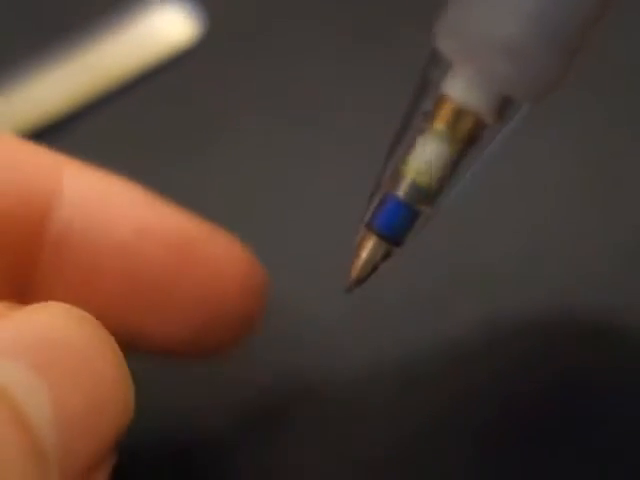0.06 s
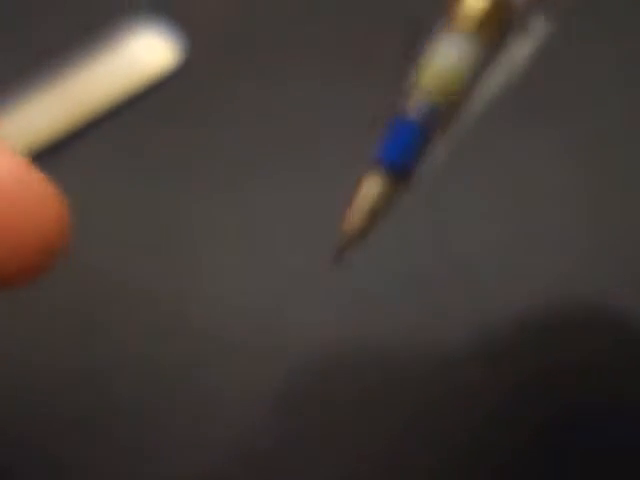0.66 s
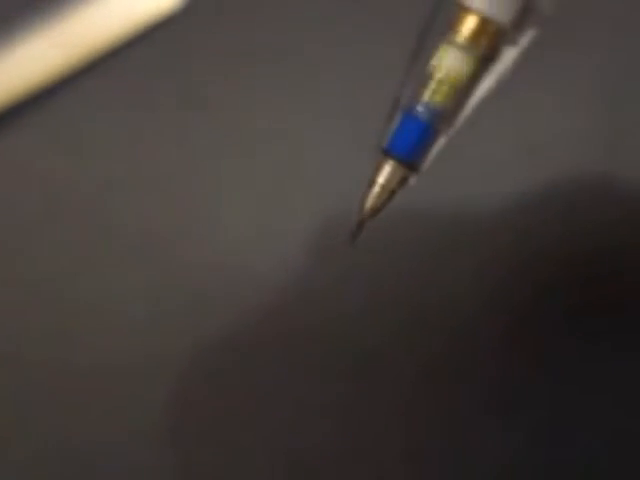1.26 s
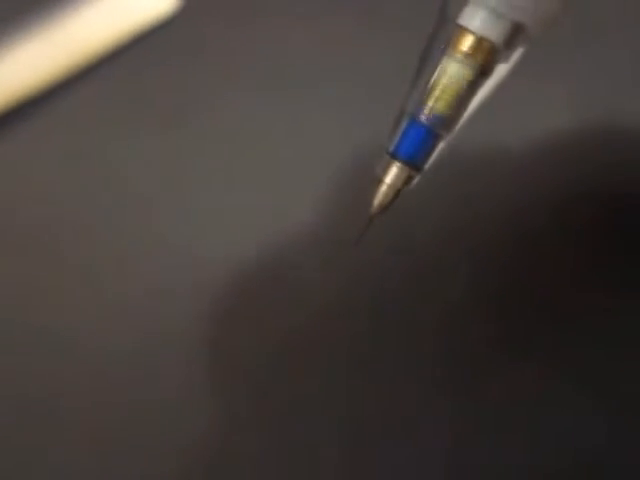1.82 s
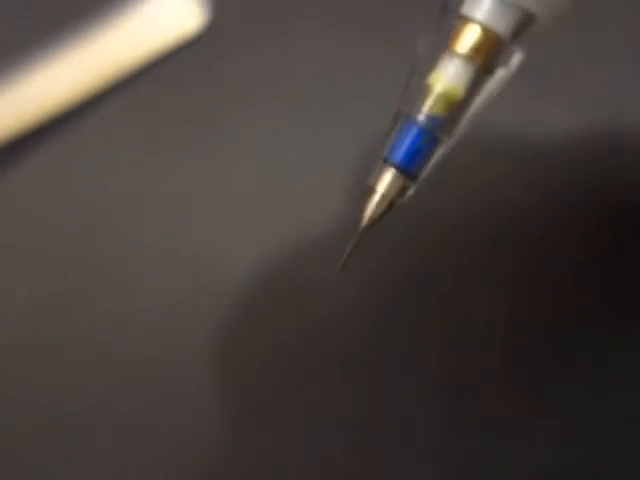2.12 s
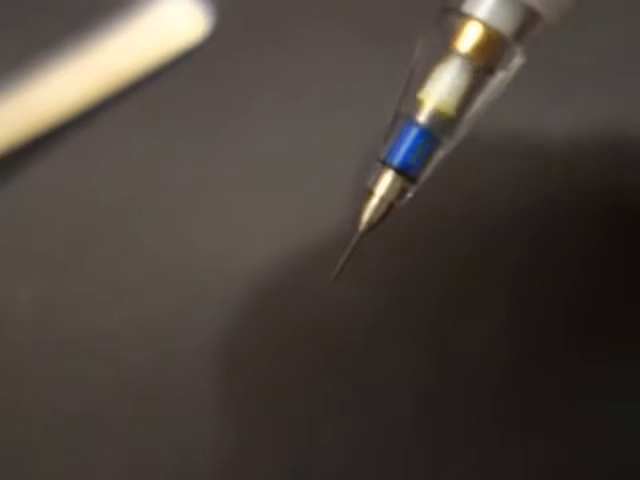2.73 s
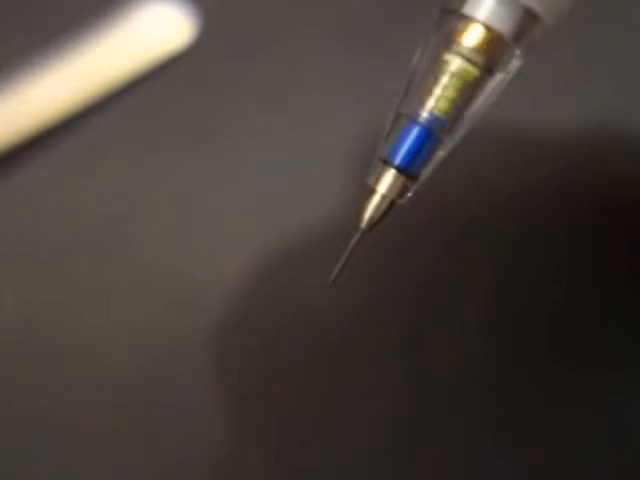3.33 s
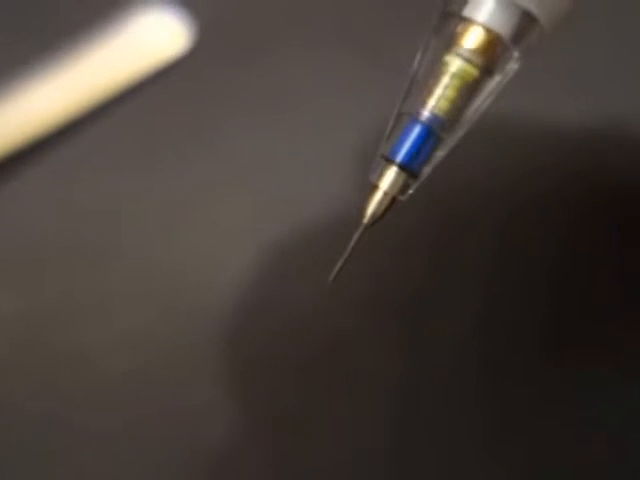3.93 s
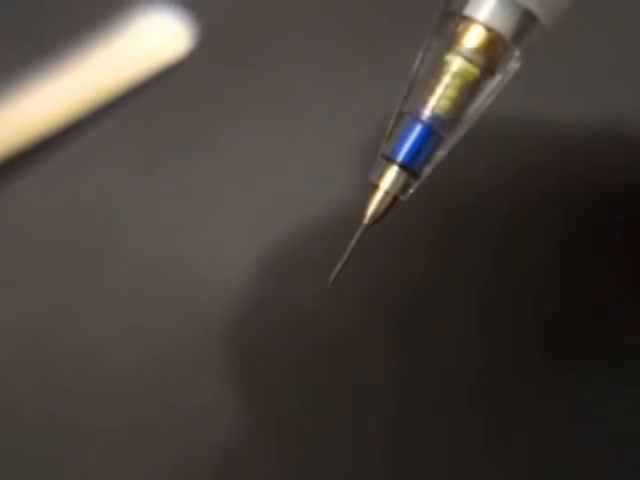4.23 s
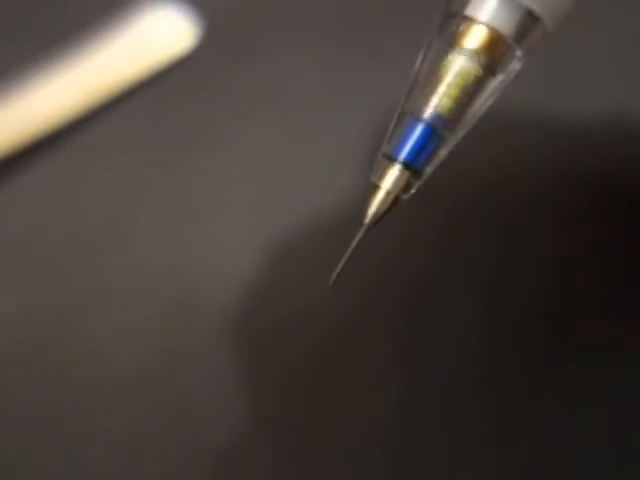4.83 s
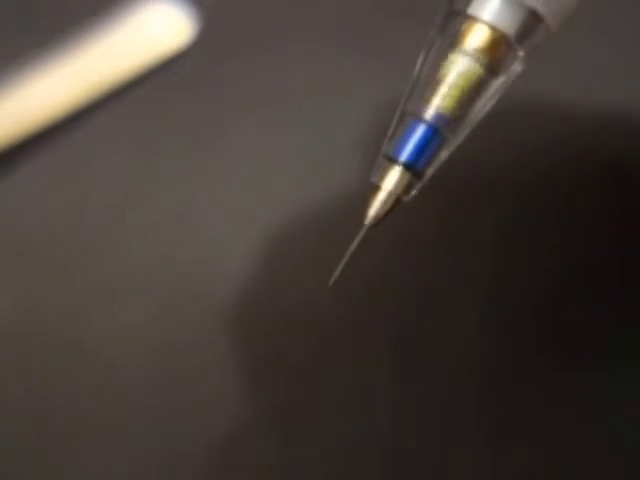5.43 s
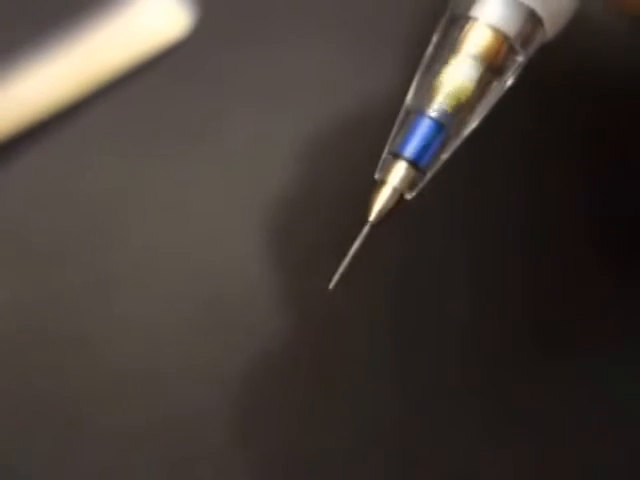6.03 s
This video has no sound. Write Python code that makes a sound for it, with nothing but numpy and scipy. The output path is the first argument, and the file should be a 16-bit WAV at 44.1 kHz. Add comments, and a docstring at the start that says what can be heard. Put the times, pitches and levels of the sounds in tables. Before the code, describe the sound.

A mechanical pencil is clicked nineteen times in about six seconds, close to the microphone and toward the right. Each press gives a tiny scrape and a sharp plastic snap, followed by a lighter double tick as the button springs back. The clicking starts quickly, eases briefly, then keeps an even pace. Faint squeaks and soft thumb thuds come with it, over the low air and hum of a quiet room.

```python
"""A mechanical pencil is clicked nineteen times, close by, over the soft air and hum of a quiet room.
It opens with a tick and a release: the clutch (the jaws that grip the lead) snaps shut and the button
knocks on its stop. Then presses and releases take turns. On each press the thumb thuds, the lead tube
slips along the spring in four ticks, the clutch ring snaps forward and a faint echo follows. The pencil
lies to the right; the hand settles within two seconds, and a last press ends the scene at six seconds."""
import sys
import numpy as np
from scipy import signal
from scipy.fft import rfft, irfft
from scipy.io import wavfile

SR = 44100
rng = np.random.default_rng(int(sys.argv[2]) if len(sys.argv) > 2 else 0)


def int16_out(signal):
    """Quantize to a 16-bit WAV file."""
    q = np.round(np.clip(np.atleast_2d(signal).T, -1, 1) * 32767)
    wavfile.write(sys.argv[1], SR, q.astype(np.int16))


N = 267598

# A click has a barrel level (its energy at 1.5-5 kHz) and a depth (the low part of that over the high).
# Its snap (5-8 kHz) and fizz (8-11 kHz), together its brightness, are counted from the barrel level.
# Each press: (time of the snap [s], barrel level [dB], depth [dB], brightness [dB], push length [s],
# friction [dB], growth of the friction [dB], relative spring rattle [dB], thumb thud [dB])
PRESSES = [(0.3007, -7, -3.5, -6.5, .029, -21, 5, -41, -55.5),
           (0.58, -6.5, 0, -4, 0.041, -24.5, -7, -62, -58),
           (0.8195, -7, -6.5, 0.7, 0.033, -22, 0, -44, -63),
           (1.0452, -10.5, 2, -5, 0.03, -18.5, -2, -45.5, -60),
           (1.3106, -7, -10, -3, .036, -22, -2, -41.5, -59.5),
           (1.7207, -11, -6, -1, 0.035, -26.5, -6, -45, -61.5),
           (2.1361, -9, -2.5, -2.5, 0.011, -32, -9, -70, -67),
           (2.4565, -8.5, -3, 1, .031, -25, -2, -49, -59.5),
           (2.7214, -7.5, 0.5, 0, 0.0097, -32, 2, -65, -78),
           (3.0517, -10.5, 0.5, -3, 0.022, -28, -1, -40, -63),
           (3.4115, -14.5, -6, 5.5, 0.019, -21, 5, -45.5, -59),
           (3.7495, -9.5, -11, -2, 0.021, -24, -5, -42.5, -69),
           (4.069, -10, -2.5, 1.5, .023, -21.5, -1, -54, -60),
           (4.4005, -10, -3, 1, 0.02, -21, -8, -45, -61.5),
           (4.7095, -10.5, -0.5, 0, .032, -25, -4, -42, -59),
           (5.0093, -9, -6, 0, .036, -29.5, -1, -42.5, -63),
           (5.312, -7, -1.5, -3.5, 0.035, -26.5, 2, -62, -74),
           (5.7426, -12, -7, 4, 0.026, -28, -16.5, -52, -68),
           (6.0641, -10.5, -6.2, 2.5, 0.028, -30, -3, -41, -71)]
# Pitches at which the pencil and the hollow inside it ring: (frequency [Hz], width [Hz], boost [dB])
RESONANCES = [(2467, 400, 9), (3660, 330, 7.5), (3930, 130, 3.5), (4410, 63, 1), (5370, 710, -5),
              (6060, 820, 2.5), (7270, 370, 2), (8280, 770, 4.5), (9730, 640, 2.5)]
# Overall tone of two parts touching: (frequency [Hz], relative level [dB])
CONTACT_TONE = [(100, -36), (700, -32), (1300, -21.5), (1800, -16.5), (2250, -6.5), (3000, -0.5),
                (4300, -3), (5200, -2), (6200, -4), (9000, -2.5), (11000, -3.5)]
# How loud the pencil is on the left compared with the right: (frequency [Hz], gain [dB])
LEFT_SHADE = [(300, 6), (1500, -2.5), (2400, -7), (3100, -14.5), (3800, -10), (4600, -13.5), (5400, -15),
              (6200, -3.5), (8000, -4), (9000, -5.5), (10500, -2)]


def gain_of(db):
    """Turns decibels into a factor to multiply by."""
    return 10 ** (np.asarray(db) / 20)


def unit_level(x):
    """Scales a sound to an average (rms) level of one."""
    return x / np.sqrt(np.mean(x ** 2) + 1e-20)


def curve(points, hz):
    """Joins points by straight lines on a log-frequency axis."""
    point_hz, value = np.transpose(points)
    return np.interp(np.log(hz + 1), np.log(point_hz + 1), value)


def humps(resonances, hz):
    """A curve in dB with one hump for each resonance."""
    return sum(db / (1 + (2 * (hz - centre) / width) ** 2) for centre, width, db in resonances)


def add(mix, s, sound):
    """Mixes a sound in, starting at s seconds."""
    part = mix[..., max(round(s * SR), 0):][..., :sound.shape[-1]]
    part += sound[..., :part.shape[-1]]


def ringing(gain):
    """A filter with this gain that rings only after it is struck (minimum phase)."""
    log_gain = np.log(np.maximum(gain, gain.max() * 1e-5))
    mirrored = np.concatenate([log_gain, log_gain[-2:0:-1]])
    return np.exp(np.conj(signal.hilbert(mirrored)))[:len(gain)]


def air(level_db=-59.0):
    """Ventilation makes a steady wash of noise, nearly the same on both sides in the bass."""
    # Tone of the moving air: (frequency [Hz], relative level [dB])
    air_tone = [(20, -11), (27, -9), (33, -18), (40, 0.5), (55, -0.5), (85, -3), (130, -3), (180, -6.5),
                (300, -6), (500, -13.5), (1000, -15.5), (2000, -12.5), (3500, -17), (6000, -17.5),
                (11000, -20.5)]
    # Pitches that stand out in it: (frequency [Hz], width [Hz], boost [dB])
    air_resonances = [(349, 83, 4.6), (824, 150, 6.1), (1259, 172, 10.4)]
    # How alike the two sides are: (frequency [Hz], likeness [0-1])
    likeness = [(30, 1), (120, 0.91), (250, 0.73), (500, 0.35), (1000, 0.4), (2500, 0.069), (10000, 0.041)]
    # Left side over right: (frequency [Hz], gain [dB])
    balance = [(100, -1), (400, -0.5), (1200, -1), (2200, -0.5), (3500, -3), (5000, -4), (7000, -1.5),
               (11000, -1)]
    hz = np.fft.rfftfreq(N, 1 / SR)
    left, separate = rfft(rng.standard_normal((2, N)))
    alike, lean_db = np.clip(curve(likeness, hz), -1, 1), curve(balance, hz) / 2
    right = alike * left + np.sqrt(1 - alike ** 2) * separate
    sides = np.array([left * gain_of(lean_db), right * gain_of(-lean_db)])
    tone = gain_of(curve(air_tone, hz) + humps(air_resonances, hz))
    return gain_of(level_db) * unit_level(irfft(sides * tone, N))


def hum(waver=0.25):
    """Four low tones waver slowly in loudness and pitch."""
    # Tones of the hum: (frequency [Hz], level [dB])
    tones = [(57, -76), (120, -70), (240, -82.5), (360, -79.5)]
    t, sound = np.arange(N) / SR, np.zeros(N)
    turns_s = np.linspace(0, t[-1], 30)
    for hz, db in tones:
        swell, drift = (np.interp(t, turns_s, rng.standard_normal(len(turns_s))) for _ in range(2))
        wave = np.sin(2 * np.pi * (hz * t + rng.random()) + waver * drift)
        sound += np.sqrt(2) * gain_of(db) * (1 + waver * swell) * wave
    return sound


def reflections(sound, near_db=-14, near_fade_s=0.039, far_db=-18, far_fade_s=0.15, size=8192):
    """Sound reflects off hand and desk, then dies away; the pattern is new for every sound."""
    # Tone of the reflections: (frequency [Hz], gain [dB])
    room_tone = [(500, 16), (2400, 1.5), (3600, 1.5), (5000, 4), (8000, -1), (11000, -1)]
    t, hz = np.arange(size) / SR, np.fft.rfftfreq(size, 1 / SR)
    near, far = rng.standard_normal((2, 2, size))
    near *= gain_of(-60 * t / near_fade_s) * (t > 0.0012)
    far *= gain_of(-60 * t / far_fade_s) * (t > 0.005)
    tail = (gain_of(near_db) * unit_level(near) + gain_of(far_db) * unit_level(far)) / np.sqrt(size)
    # on the left, reflections are less shaded than the direct sound
    tone_db = curve(room_tone, hz) + np.outer([0.85, 0], curve(LEFT_SHADE, hz))
    return irfft(rfft(sound, size) * rfft(tail) * gain_of(tone_db))


def place_right(sound, turned_extra=0.29):
    """Above the bass, the left side hears the pencil later and softer, most before the hand settles."""
    # How far the left wave runs ahead of the right: (frequency [Hz], phase [radians])
    left_phase = [(100, 0.39), (1900, -0.25), (3000, -0.51), (4300, -0.78), (6500, -1.12), (11000, -1.16)]
    # The hand settles: (time [s], extra turn to the right [0-1])
    hand_turn = [(0, 1), (0.45, 0.78), (1.05, 0.7), (1.8, 0.1), (6.07, 0.034)]
    hz, spectrum = np.fft.rfftfreq(2 * N, 1 / SR), rfft(sound, 2 * N)
    shade_db, phase = curve(LEFT_SHADE, hz), curve(left_phase, hz)
    settled, turned = (irfft(spectrum * gain_of(amount * shade_db) * np.exp(1j * amount * phase))[:N]
                       for amount in (1, 1 + turned_extra))
    turn = np.interp(np.arange(N) / SR, *np.transpose(hand_turn))
    return np.array([settled + turn * (turned - settled), sound])


def thumb(length_s=0.047, early_s=0.03):
    """Each press shoves the hand a little: a soft, low thud."""
    # Tone of the thud: (frequency [Hz], relative level [dB])
    thud_tone = [(20, -7.5), (45, -9.5), (70, 3), (110, 0), (170, -14.5), (260, -7), (380, -15.5),
                 (800, -25), (3000, -46)]
    thuds, count = np.zeros(N), int(length_s * SR)
    tone = gain_of(curve(thud_tone, np.fft.rfftfreq(count, 1 / SR)))
    for s, *_, db in PRESSES:
        thud = irfft(rfft(rng.standard_normal(count)) * tone, count) * np.hanning(count)
        add(thuds, s - early_s, gain_of(db) * unit_level(thud))
    return thuds


def squeak(s, length_s, start_hz, end_hz, db, width_hz):
    """Plastic sticks and slips: a fuzzy, gliding whistle. Returns (start time, sound)."""
    count = int(length_s * SR)
    glide = np.exp(2j * np.pi * np.cumsum(np.linspace(start_hz, end_hz, count)) / SR)
    low_pass = signal.butter(2, width_hz, fs=SR, output="sos")
    fuzz = signal.sosfilt(low_pass, rng.standard_normal(count) / glide)
    return s, gain_of(db) * unit_level((fuzz * glide).real * np.hanning(count))


def scrape(shape, db, grain_db, treble_db, slips_per_s=4000):
    """Tiny random slips make the pencil ring; more grain_db makes their sizes more uneven."""
    count = len(shape)
    sizes = gain_of(grain_db * np.minimum(rng.exponential(1, count), 4))
    slips = shape * sizes * rng.standard_normal(count) * (rng.random(count) < slips_per_s / SR)
    hz = np.fft.rfftfreq(2 * count, 1 / SR)
    dulling_db = curve([(4000, 0), (7000, treble_db)], hz)
    tone = gain_of(curve(CONTACT_TONE, hz) + humps(RESONANCES, hz) + dulling_db)
    return gain_of(db) * unit_level(irfft(rfft(slips, 2 * count) * ringing(tone))[:count])


def band_gains(power, hz, barrel_db, depth_db, snap_db, fizz_db):
    """Where and how hard a blow lands shares its energy among four bands of pitch."""
    upper_db = barrel_db - 10 * np.log10(1 + gain_of(depth_db) ** 2)
    wanted_db = np.array([upper_db + depth_db, upper_db, barrel_db + snap_db, barrel_db + fizz_db])
    bands_hz = [(1500, 3100), (3100, 5000), (5000, 8000), (8000, 11200)]
    lift_db = wanted_db - [10 * np.log10(power[(hz > lo) & (hz < hi)].sum()) for lo, hi in bands_hz]
    # below 1.8 kHz the gain follows the smaller barrel lift, so the bass is never raised far
    steps_db = [lift_db[:2].min(), *lift_db[[0, 0, 1, 1, 2, 2, 3]]]
    return gain_of(np.interp(hz, [1800, 2300, 2700, 3500, 4400, 5800, 7300, 8700], steps_db))


def click(s, barrel_db, depth_db, snap_db, fizz_db, chatter=0.21, chatter_s=0.001, catch=0.058):
    """A part scrapes over its catch, lands and chatters. Returns (start time, sound)."""
    size, landing = 2048, 120  # samples
    catch_s, travel_s, detune, vary_db = 0.0008, 0.0004, 0.014, 4.0
    t, hz = (np.arange(size) - landing) / SR, np.fft.rfftfreq(size, 1 / SR)
    roughness = np.where(t < 0, catch * np.exp(-abs(t) / catch_s), chatter * np.exp(-abs(t) / chatter_s))
    force = rng.standard_normal(size) * roughness
    force *= 1 - np.exp(-abs(t) / 0.00011)  # a tiny hush around the blow
    force[landing] = 1
    # the grip shifts the resonances a little each time
    shifts = rng.standard_normal((len(RESONANCES), 2))
    shifted = [(centre * (1 + detune * pitch), width, db + vary_db * level)
               for (centre, width, db), (pitch, level) in zip(RESONANCES, shifts)]
    tone = gain_of(curve(CONTACT_TONE, hz) + humps(shifted, hz))
    power = abs(rfft(force) * tone) ** 2 * 2 / size
    tone *= band_gains(power, hz, barrel_db, depth_db, snap_db, fizz_db)
    # higher bending waves run down the barrel faster; at 8 kHz they take travel_s
    bending = np.exp(-4j * np.pi * travel_s * np.sqrt(8000 * hz))
    return s - landing / SR - travel_s, irfft(rfft(force) * ringing(tone) * bending)


def release(s, barrel_db, snap_db, fizz_db, delay_s, knock_db, knock_depth_db, slide_s=0.056):
    """On the way up the tube slides back, the clutch shuts and the button knocks on its stop."""
    usual_db = -20  # an ordinary blow
    harder_db = knock_db - usual_db  # a harder knock is duller, with a louder slide before it
    swell = np.linspace(0.1, 1, int(slide_s * SR)) ** 1.24
    yield s + delay_s - slide_s, scrape(swell, -59 + 0.5 * harder_db, grain_db=6.5, treble_db=-9)
    depth_db = -5.5 + 0.2 * (barrel_db - usual_db)  # the clutch sounds deeper when it shuts harder
    yield click(s, barrel_db, depth_db, snap_db, fizz_db, chatter=0.087, chatter_s=0.00032, catch=0.075)
    yield click(s + delay_s, knock_db, knock_depth_db,
                snap_db=-7 - 0.2 * harder_db, fizz_db=-9.5 - 0.45 * harder_db)


def press(s, barrel_db, depth_db, bright_db, push_s, friction_db, growth_db, spring_db):
    """On the way down the tube slides and slips, the ring snaps and the spring rattles."""
    # The four places where every push sticks and slips:
    # (share of the push [0-1], level over the friction [dB], depth [dB], snap [dB], fizz [dB])
    slips = [(0, 0.5, -2.5, -13, -14), (0.278, 2, 1, -5, -12), (.54, -2, -3, -9.5, -23),
             (.8, -5, -10, -5, -13)]
    creak_s, slide_s, echo_s, rattle_s = 0.054, 0.04, 0.01, 0.03
    scatter_s, scatter_db = 0.0006, 1.5
    # faint creaks as the thumb takes up the slack of the button
    rise = np.linspace(0.3, 1, int(creak_s * SR))
    yield s - push_s - creak_s, scrape(rise, db=-70, grain_db=8, treble_db=-13, slips_per_s=270)
    swell = np.sin(np.pi * np.linspace(0, 1, int(slide_s * SR)) ** 2.4)
    yield s - slide_s, scrape(swell, friction_db - 31.5, grain_db=9, treble_db=-7.5)
    for (share, db, *tone), (late, hard) in zip(slips, rng.standard_normal((len(slips), 2))):
        slip_db = friction_db + growth_db * (share - 0.4) + db + scatter_db * hard
        yield click(s - push_s * (1 - share) + scatter_s * late, slip_db, *tone)
    # the ring snaps; a faint, brighter echo follows about 10 ms later
    yield click(s, barrel_db, depth_db, bright_db, bright_db, chatter=0.19, catch=0.12)
    yield click(s + echo_s, barrel_db - 23, depth_db, bright_db + 4.5, bright_db + 4.5)
    fade = np.sin(np.pi * np.linspace(0, 1, int(rattle_s * SR)) ** 0.28)
    yield s, scrape(fade, spring_db - 5, grain_db=5.5, treble_db=-2.5)


def pencil():
    """Yields (start time, sound) for the presses, the releases, further ticks and the squeaks."""
    # The clutch shuts, then the button knocks: (time [s], barrel level [dB], snap [dB], fizz [dB],
    # knock delay [s], knock level [dB], knock depth [dB])
    releases = [(0.1165, -17, -14, -3, 0.0095, -8.5, -3), (0.4301, -12.5, -14, 2.5, 0.019, -3, 6),
                (0.7102, -18.5, -7, 5.5, 0.011, -10, 3), (0.9263, -10, -1.5, 3, 0.011, -17, -5),
                (1.1482, -26.5, -3, 4, 0.019, -17, -5.5), (1.4676, -20, -7, 4, 0.0086, -15, -4.5),
                (1.8609, -13, -1.5, 1.5, .0102, -18.5, -5), (2.2583, -27.5, 4, 2.1, 0.022, -21, -3.5),
                (2.5789, -20.5, 0.3, 8.5, 0.013, -19.5, -4), (2.8597, -17, 6.5, 0, 0.013, -19, -6),
                (3.1978, -24, 0, 10, 0.012, -19, -6), (3.5428, -21.5, 0, 8, 0.012, -16.5, -2.5),
                (3.8854, -28, 8.5, 4.5, .0118, -17, -2.5), (4.2051, -19, 1, 8, 0.01, -17.5, -16),
                (4.5314, -18.5, 8, 4, 0.012, -18, -7.5), (4.856, -19.5, 0.5, 5, 0.0096, -19.5, -1),
                (5.1579, -16, 4.5, 5.5, .0096, -15, 4), (5.4612, -17.5, 9, 4, 0.0098, -17, -5),
                (5.8981, -23, 4, 10, .011, -18, -3.5)]
    # Further ticks, many falling among the slips of a push and sounding alike: (time [s], barrel level [dB],
    # depth [dB], brightness [dB])
    ticks = [(0.0027, -18.5, -9, -6.5), (0.1032, -31, 7, -20), (0.2858, -13.5, -1, -12),
             (0.3576, -8.5, 1.5, -5.5), (0.4238, -18, 9, -13), (0.44, -14, -3, -9), (0.6295, -27, -3, -9),
             (0.5497, -19, -2, -13), (0.6878, -26.5, 9, -20), (0.7363, -21, -4.5, -4),
             (0.8019, -12, -1, -10), (0.849, -25, -7, -20), (0.947, -20.5, 4, -6), (1.0172, -15, -10, -9),
             (1.4814, -20, -9, -5), (2.088, -24, 1, -12), (2.2866, -27, -7, 2), (2.5975, -23.5, -6, -5),
             (3.0333, -24, 9, -11), (3.739, -22, 4, 2), (4.254, -32, -5, 2), (4.994, -12, 3, -16),
             (5.2535, -31, 1, -12)]
    # Plastic rubs: (time [s], length [s], start pitch [Hz], end pitch [Hz], level [dB], width [Hz])
    squeaks = [(0.162, 0.087, 3470, 3520, -66, 160), (1.328, 0.13, 2100, 1760, -71, 160),
               (1.526, .06, 3630, 3730, -63.5, 100), (2.492, 0.11, 2030, 2060, -68, 140),
               (2.944, 0.065, 2700, 2850, -77, 140), (4.75, 0.086, 3460, 3700, -70, 200),
               (5.469, 0.12, 3400, 3630, -64, 400), (5.607, 0.12, 3970, 3900, -67.5, 350)]
    for *row, _ in PRESSES:
        yield from press(*row)
    for row in releases:
        yield from release(*row)
    for s, barrel_db, depth_db, bright_db in ticks:
        yield click(s, barrel_db, depth_db, snap_db=bright_db, fizz_db=bright_db - 11)
    for row in squeaks:
        yield squeak(*row)


def scene():
    """The pencil and its reflections, with the thumb, the air and the hum behind."""
    direct, echoes = np.zeros(N), np.zeros((2, N))
    for s, sound in pencil():
        add(direct, s, sound)
        add(echoes, s, reflections(sound))
    return place_right(direct) + echoes + thumb() + air() + hum()


def record(dry, edge_hz=11080, top_hz=14500, leak_db=-41):
    """Cuts the treble above edge_hz; a trace of the sharpest snaps gets through, up to top_hz."""
    main, wide = (signal.firwin(301, hz, window=("kaiser", 8), fs=SR) for hz in (edge_hz, top_hz))
    treble_cut = main + gain_of(leak_db) * (wide - main)
    return signal.oaconvolve(dry, treble_cut[None], "same")


dry = scene()
out = record(dry)
int16_out(out)
```